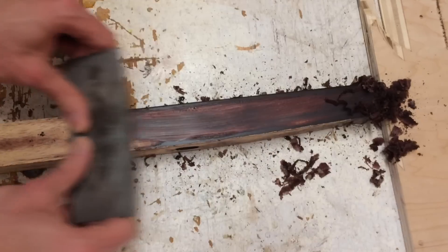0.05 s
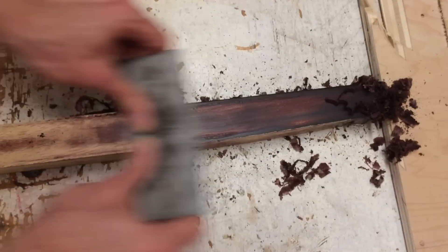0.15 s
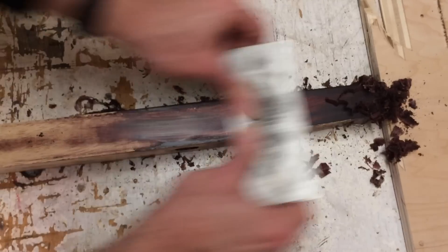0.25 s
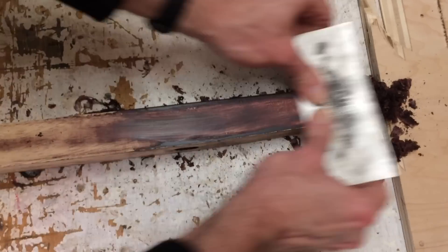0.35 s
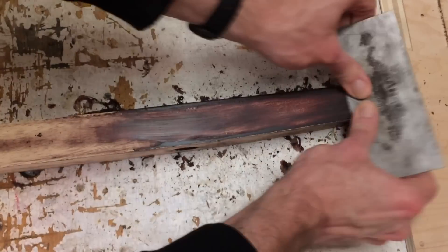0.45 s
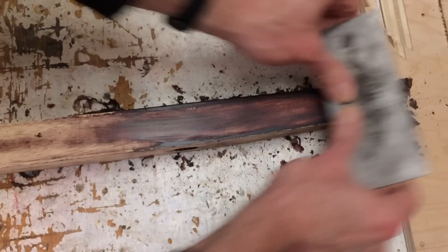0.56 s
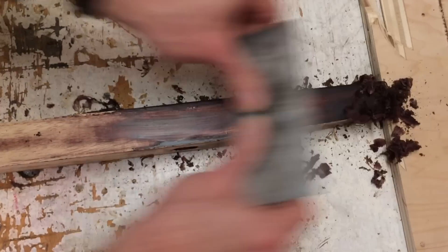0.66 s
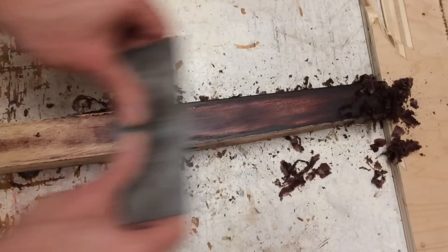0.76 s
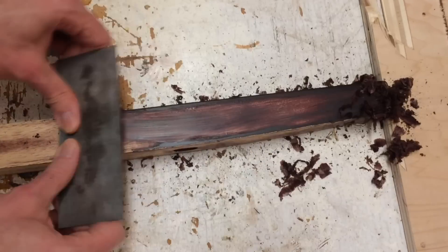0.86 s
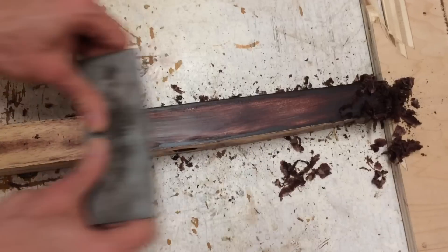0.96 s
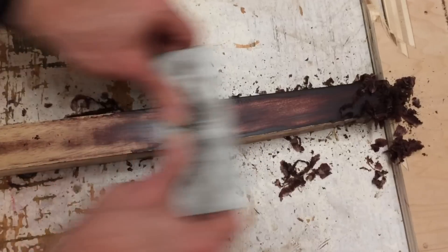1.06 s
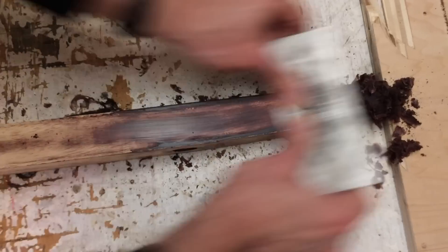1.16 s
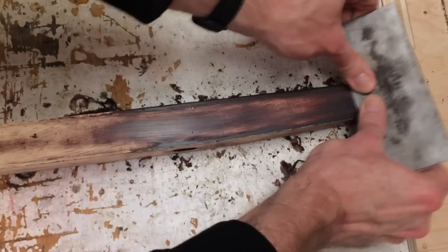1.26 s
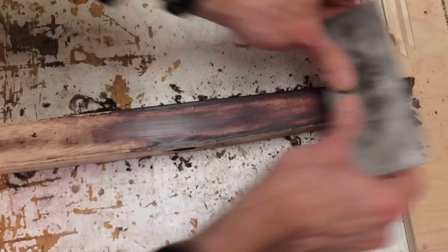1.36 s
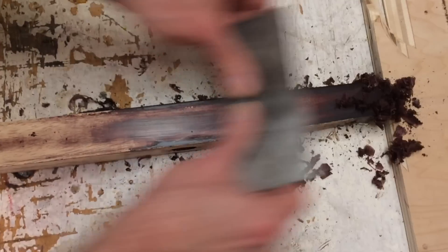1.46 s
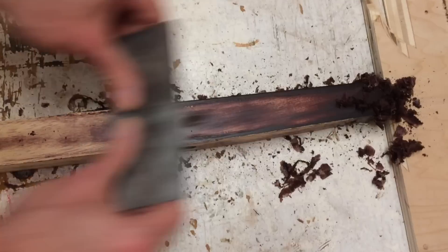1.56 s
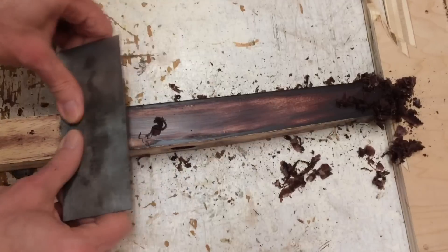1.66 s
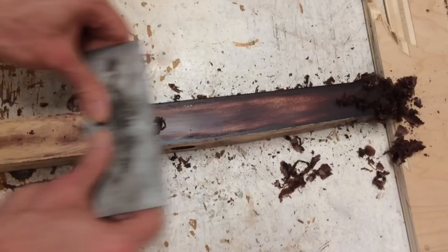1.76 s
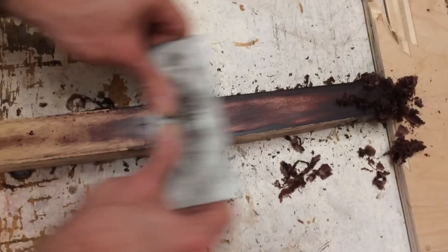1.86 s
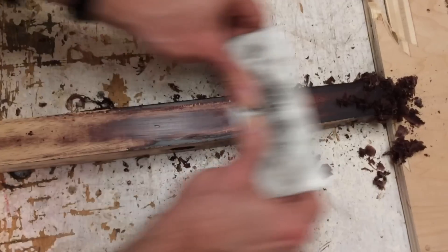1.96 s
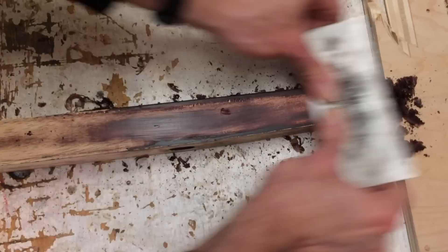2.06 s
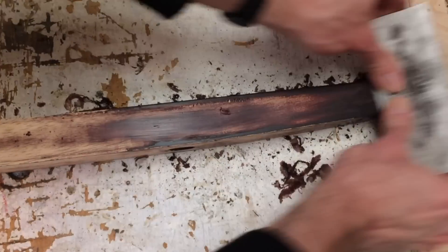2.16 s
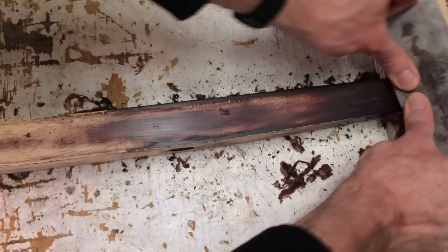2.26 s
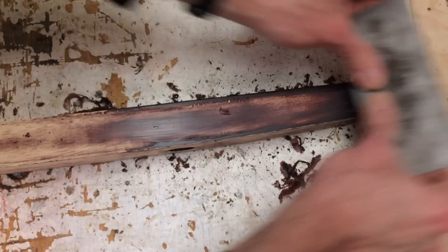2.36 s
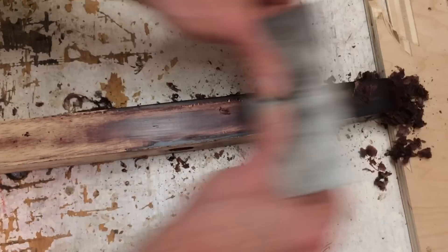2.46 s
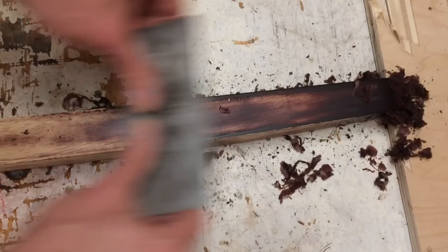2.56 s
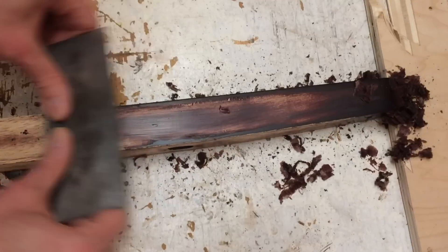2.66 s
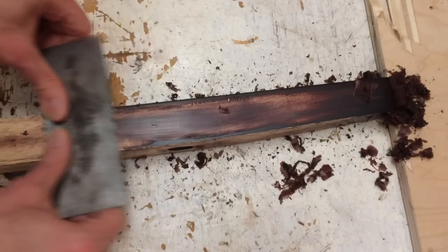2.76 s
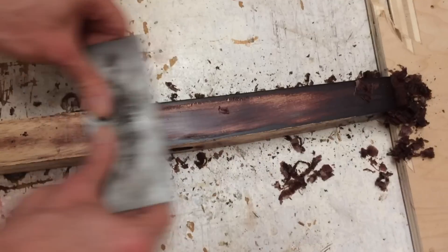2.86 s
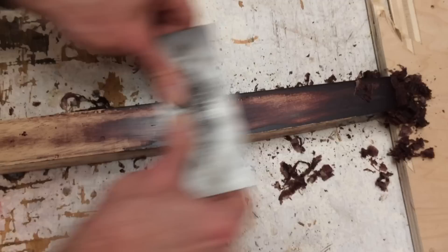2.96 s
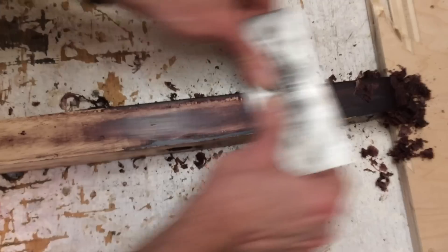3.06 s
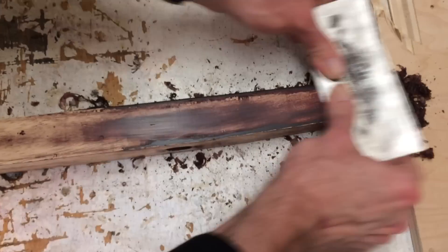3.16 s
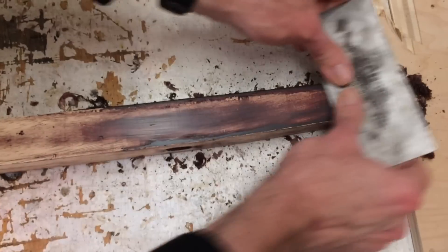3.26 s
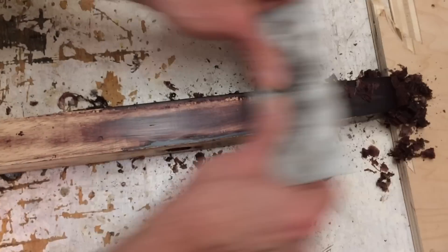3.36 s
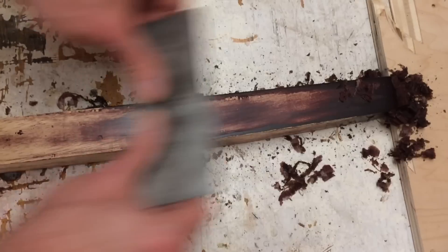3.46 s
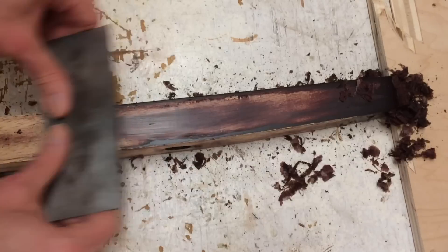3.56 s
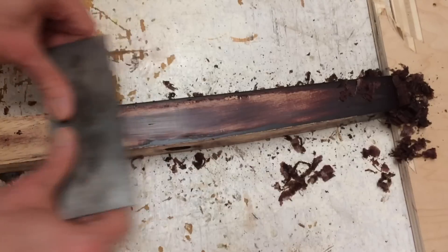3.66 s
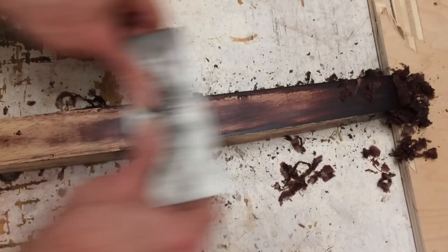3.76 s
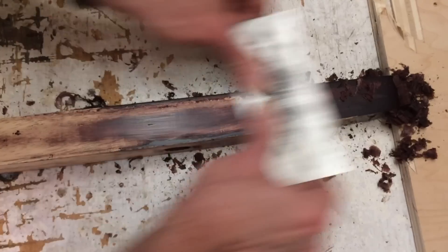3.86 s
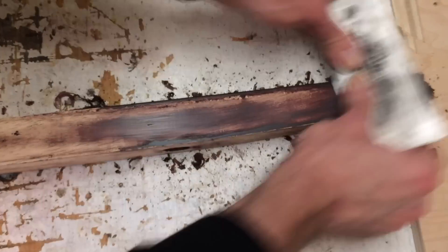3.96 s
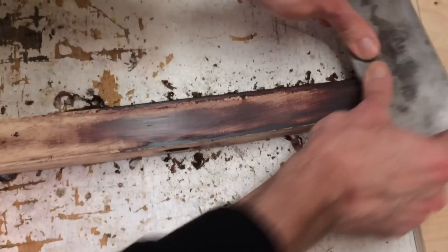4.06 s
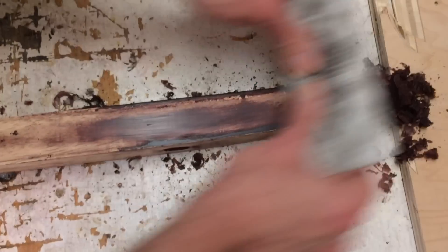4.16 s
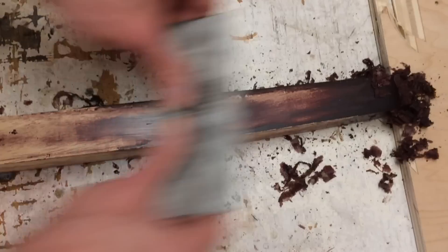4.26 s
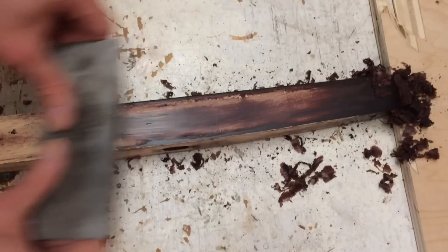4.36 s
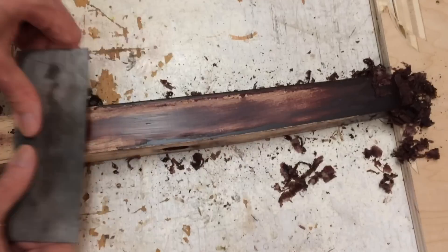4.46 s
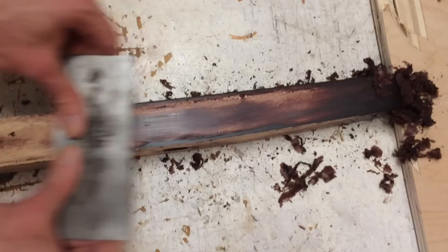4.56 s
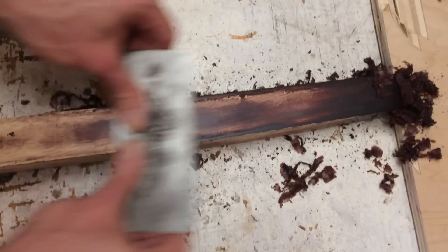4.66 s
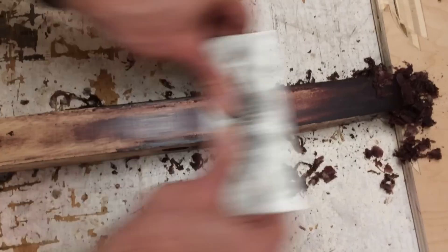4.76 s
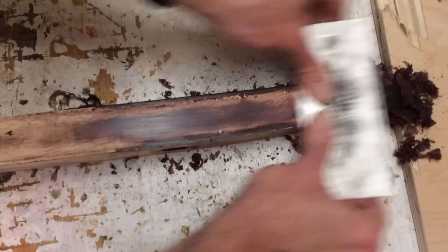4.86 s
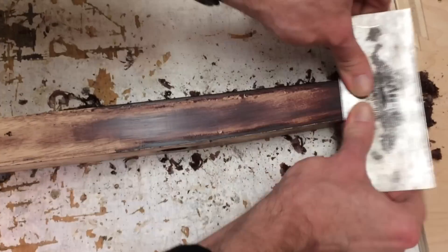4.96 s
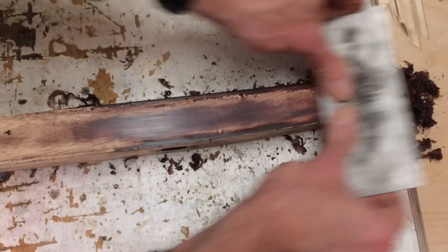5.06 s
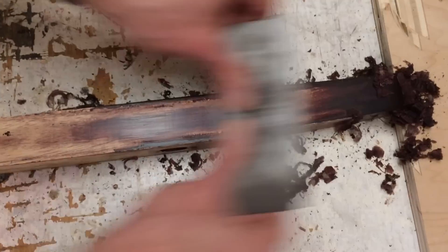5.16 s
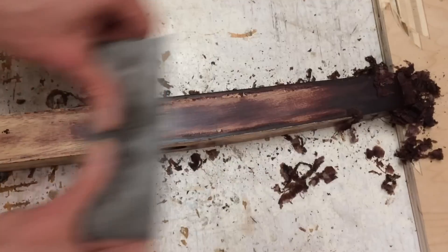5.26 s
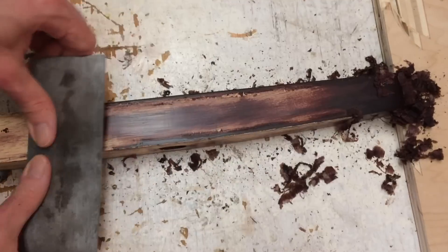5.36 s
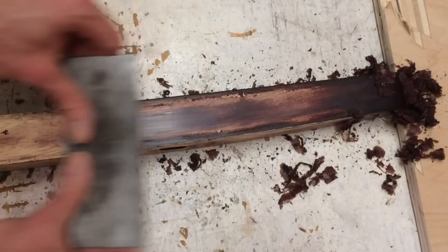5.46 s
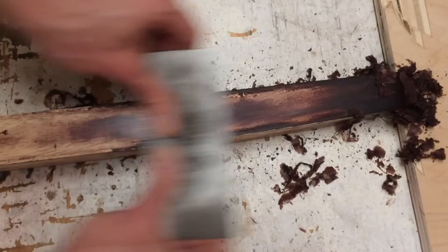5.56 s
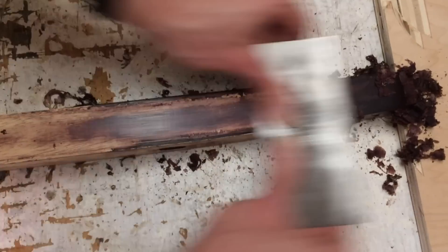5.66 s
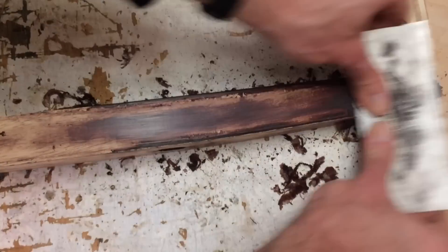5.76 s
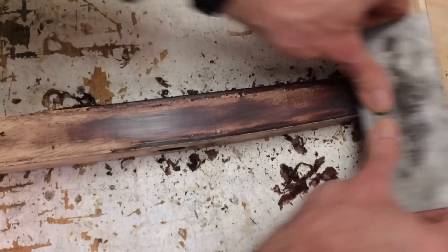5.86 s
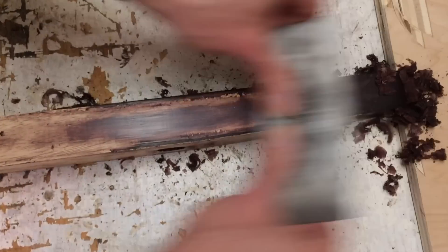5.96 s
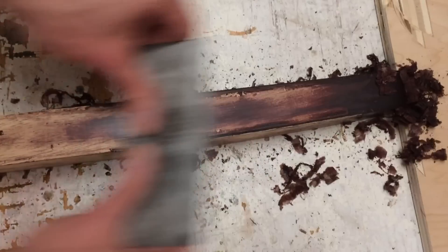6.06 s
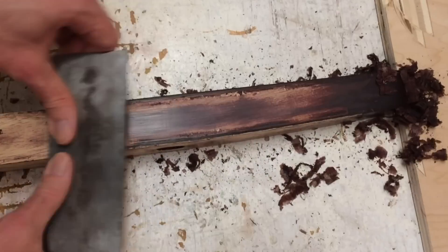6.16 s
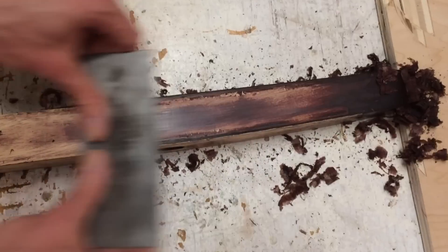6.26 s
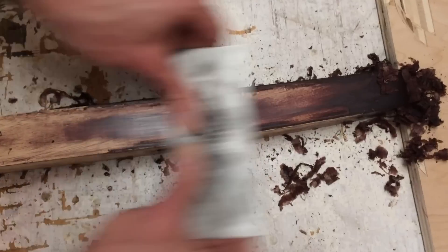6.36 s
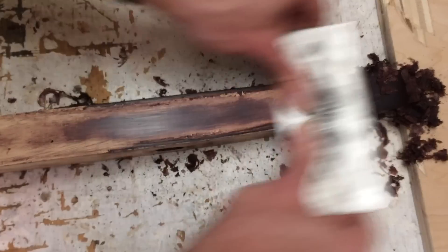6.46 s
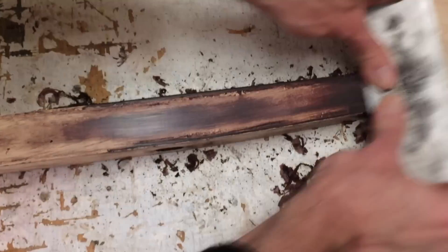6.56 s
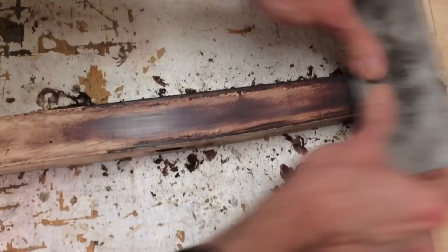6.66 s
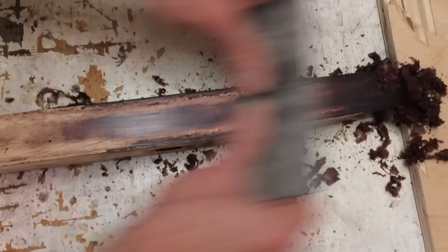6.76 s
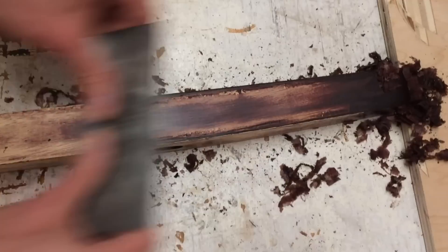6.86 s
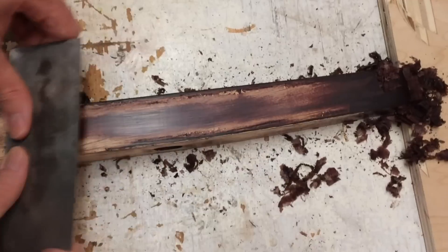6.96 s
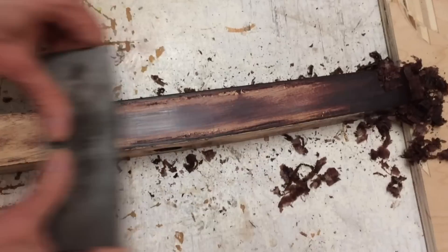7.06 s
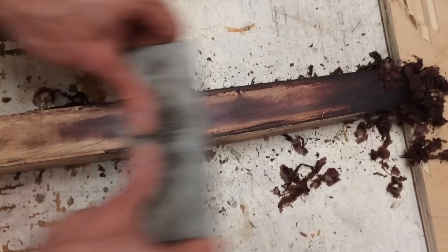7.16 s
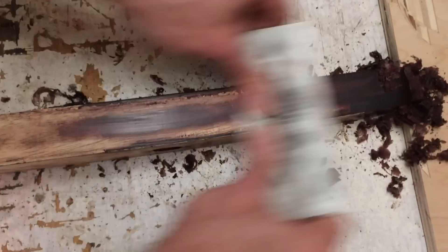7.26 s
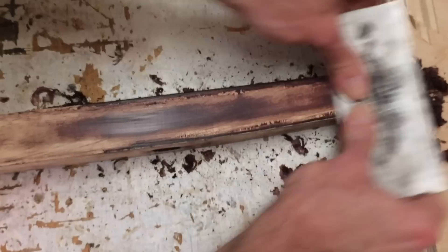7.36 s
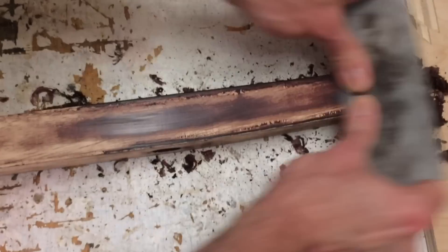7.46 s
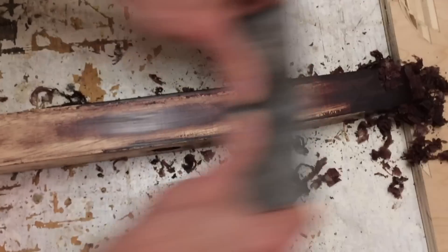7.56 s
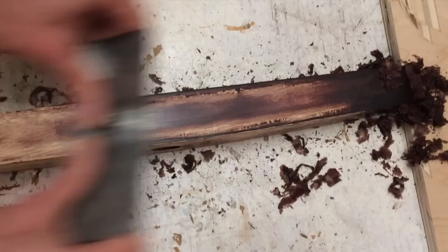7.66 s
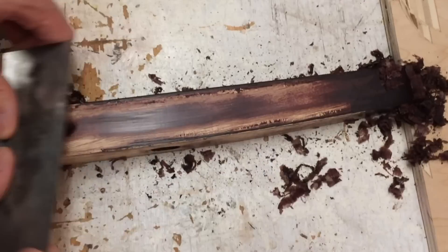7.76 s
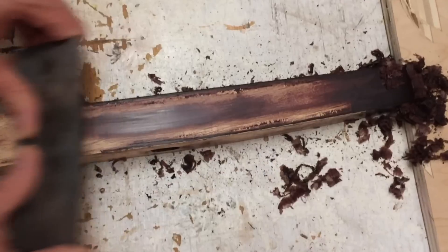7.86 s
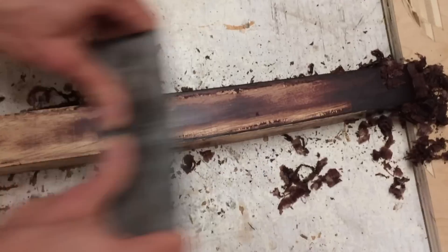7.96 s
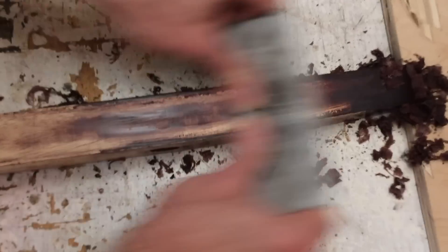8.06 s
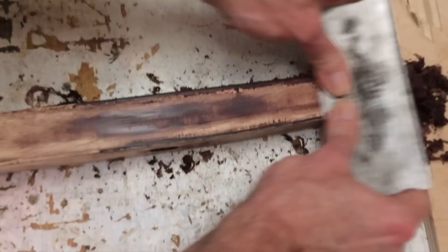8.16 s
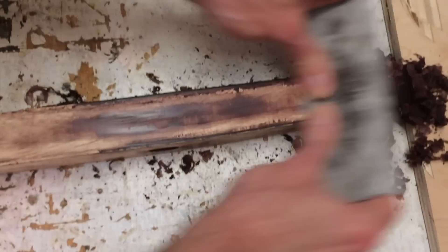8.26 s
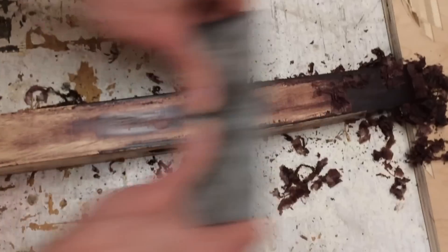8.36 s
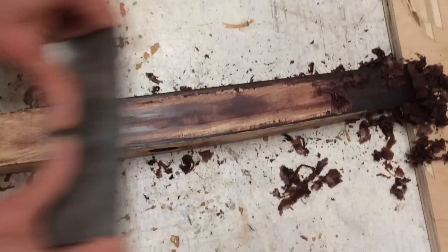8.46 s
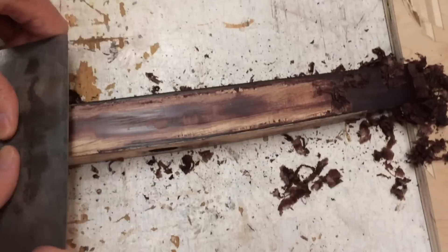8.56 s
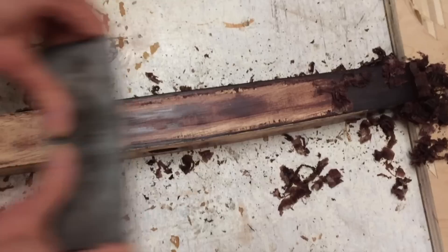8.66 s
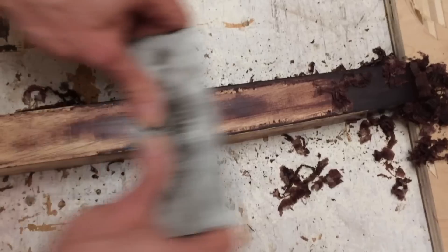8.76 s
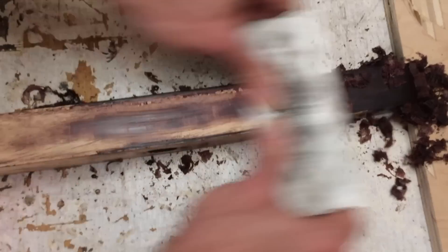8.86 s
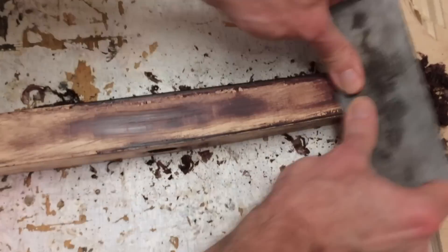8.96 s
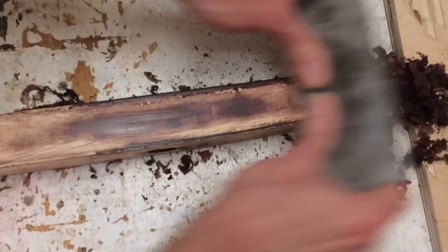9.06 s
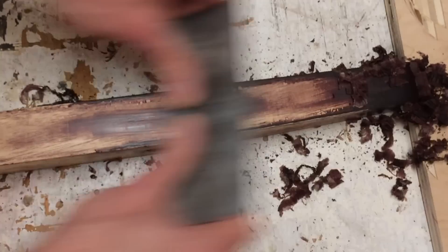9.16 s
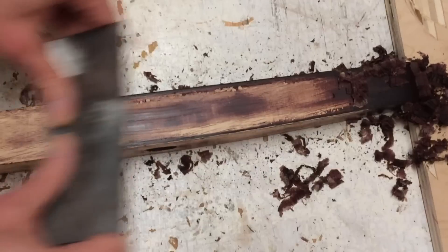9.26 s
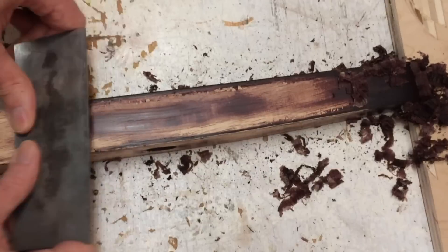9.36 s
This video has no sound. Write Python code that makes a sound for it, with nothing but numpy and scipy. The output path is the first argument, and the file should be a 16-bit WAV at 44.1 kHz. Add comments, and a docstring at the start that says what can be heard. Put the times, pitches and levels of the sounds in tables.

```python
"""A steel card scraper is pushed along a wooden chair leg on a workbench, stroke after stroke.
Its edge tears off old finish in countless tiny fractures, made as random pulses: they hiss, and through resonators
they ring the steel, rasp in the wood and shake leg and bench.
Each stroke starts with struck modes: the tick of the blade landing and the leg knocking on the bench.
Fingers rustle on some ways back; filtered noise and wavering sines give still air and a faint machine hum."""
import sys
import numpy as np
from scipy import signal
from scipy.fft import rfft, irfft
from scipy.io import wavfile
from scipy.ndimage import uniform_filter1d, map_coordinates

SR = 44100
rng = np.random.default_rng(int(sys.argv[2]) if len(sys.argv) > 2 else 0)


def wrap_up_sound(samples):
    """Save the sound to the file named by the first command line argument, as 16-bit audio."""
    columns = np.atleast_2d(samples).T
    # keep every value between -1 and 1, then stretch to whole-number steps
    tamed = np.clip(columns, -1, 1)
    steps = np.round(tamed * 32767).astype(np.int16)
    wavfile.write(sys.argv[1], SR, steps)


N = 414540
T = np.arange(N) / SR

# the blade lands: (time [s], level of the steel ring [dB], level of the finish crack [dB]), before trims
LANDINGS = [(0.0988, -25.5, -30), (0.9441, -27.5, -39.5), (1.76, -27.5, -41), (2.7906, -26.5, -41),
            (3.688, -28, -69), (4.5381, -32, -89), (5.468, -34.5, -48), (6.2572, -46, -62),
            (7.0808, -26, -28), (7.8471, -37, -58.5), (8.597, -41.5, -56.5), (9.3569, -34, -43)]
# the push after each landing: (hardest at [s], blade lifts at [s], hiss at the hardest [dB], swell up to it [dB],
# easing after it [dB], then wood rasp, sizzle, leg shake and bench shake, each relative to the hiss [dB]);
# each part's response law adds its own offset, share and lag
STROKES = [(.29, .504, -46.5, 12, 19, -2.5, 8.5, 3.7, 0), (1.197, 1.312, -44, 10.5, 19, -3.1, 2, 1.8, 2),
           (2.046, 2.248, -45, 15.5, 13, 2, 4, 6, 6), (3.165, 3.214, -46.5, 21.5, 5.5, 4, 2.5, 10, 9.5),
           (4.01, 4.05, -46, 12.5, 5, 2, 2.1, 6, 4), (4.88, 5.005, -44.5, 13.5, 2, -2.5, 3, -1.5, -2.5),
           (5.762, 5.822, -42, 19.5, 5.5, 1, -1, -2, 0.5), (6.493, 6.606, -45, 18, 5.5, 1.5, 4.5, 2.6, 1),
           (7.317, 7.431, -40, 11.5, 3.5, -1.5, 1.5, -2.3, -1), (8.064, 8.212, -37, 37, 10, -1, 2, -3, -1),
           (8.8, 8.984, -42, 43, 0, -2.7, 1, 1.5, 0.5), (9.6, 9.75, -45.5, 16, 5, 4.5, 0, -7, -1.5)]


def from_db(db):
    """Decibels to gain."""
    return 10 ** (np.asarray(db) / 20)


def rms_one(x):
    """Scale to unit power."""
    return x / np.sqrt(np.mean(x ** 2) + 1e-20)


def slow_noise(rate, step):
    """Noise smoothed by a double pole at a rate in Hz, one value per step of samples, with a spread of 1."""
    r = np.exp(-2 * np.pi * rate * step / SR)
    noise = rng.standard_normal((N + SR) // step + 2)
    settled = signal.lfilter([1], [1, -2 * r, r * r], noise)[SR // step:]
    return rms_one(settled)


def drift(rate, step=16):
    """Smooth chance with a spread of 1, interpolated between coarse steps."""
    slow = slow_noise(rate, step)
    return np.interp(T, np.arange(len(slow)) * step / SR, slow)


def swell(depth_db, rate, step=32):
    """A slow random gain, kept within twice its depth and held over each coarse step."""
    bounded = 2 * np.tanh(slow_noise(rate, step) / 2)
    return np.repeat(from_db(depth_db * bounded), step)[:N]


def coloured(x, spectrum):
    """Give a noise a smooth spectrum; rms 1."""
    hz, db = np.transpose(spectrum)
    bins = np.maximum(np.fft.rfftfreq(N, 1 / SR), 1)
    gain = from_db(np.interp(np.log(bins), np.log(hz), db))
    return rms_one(irfft(rfft(x) * gain, N))


def band(x, low_hz, high_hz):
    """Causal band-pass."""
    edges = [low_hz, min(high_hz, SR / 2 - 1000)]
    return signal.sosfilt(signal.butter(2, edges, "band", fs=SR, output="sos"), x + 1e-18)


def add(track, s, sound):
    """Mix a short sound into a track at a time."""
    i = int(s * SR)
    track[i:i + len(sound)] += sound[:N - i]


def fractures(per_s):
    """Tiny breaks of uneven size at random moments; rms 1."""
    return rms_one(rng.standard_normal(N) * (rng.random(N) < per_s / SR))


def resonate(x, peaks, wander_db, wander_rate):
    """Parallel resonances of alternating sign; each swells and fades as the blade passes its nodes."""
    out = np.zeros(N)
    for k, (hz, width, db) in enumerate(peaks):
        r = np.exp(-np.pi * width / SR)
        poles = [1, -2 * r * np.cos(2 * np.pi * hz / SR), r * r]
        ringing = (1 - r * r) / 2 * signal.lfilter([1, 0, -1], poles, x)
        out += (-1) ** k * from_db(db) * swell(wander_db, wander_rate) * ringing
    return out


def strike(modes, contact, vary_db):
    """One blow: the modes build up over the contact time [s], each with a strength of its own."""
    t = T[:SR // 3]
    rings = np.zeros(len(t))
    for hz, db, t60 in modes:
        level_db = db + vary_db * rng.standard_normal() - 60 * t / t60
        rings += from_db(level_db) * np.sin(2 * np.pi * hz * t)
    return rings * (1 - np.exp(-t / contact))


def workshop():
    """Still air is shaped noise; the distant machine's hum is sines wavering in level and pitch."""
    # still air, spectrum shape: (frequency [Hz], level per Hz [dB])
    air_spectrum = [(20, -29.5), (35, -7), (60, -1), (110, -5), (170, -9.5), (250, -16), (400, -19),
                    (700, -26), (1500, -27.5), (4000, -33.5), (9000, -36.5), (16000, -38.5)]
    # machine hum, relative lines: (frequency [Hz], level [dB])
    hum_lines = [(96, -11), (120, -1.5), (144, -10.5), (170, -9.5)]
    # rise and fall of the hum: (time [s], level [dB])
    hum_levels = [(0, -97), (4.4, -68), (5.3, -59.5), (6.1, -57.5), (6.9, -66.5), (7.7, -68.5), (9.4, -73)]
    hum = np.zeros(N)
    for hz, db in hum_lines:
        line_gain = from_db(db + 2.5 * drift(2.3))
        phase = 2 * np.pi * np.cumsum(hz * (1 + 0.0078 * drift(2))) / SR
        hum += line_gain * np.sin(phase)
    air = from_db(-66.5) * coloured(rng.standard_normal(N), air_spectrum)
    return from_db(np.interp(T, *np.transpose(hum_levels))) * rms_one(hum) + air


def landings(crack_decay, crush_db):
    """Steel meets wood: a short ring damped by the fingers, with a dull crush and a bright crack of old finish."""
    # struck card, relative modes: (frequency [Hz], level [dB], t60 [s])
    blade_modes = [(1065, -9, 0.043), (1343, -9, 0.027), (1615, 10.5, 0.009), (1787, -6.5, 0.031),
                   (2143, -11.5, 0.055), (2870, -2, 0.0093), (3457, -13, 0.025), (4123, -23, 0.081),
                   (7170, -5, 0.0089)]
    out, t = np.zeros(N), T[:SR // 20]
    for s, ring_db, crack_db in LANDINGS:
        burst = rng.standard_normal(len(t)) * np.exp(-t / crack_decay)
        add(out, s, from_db(ring_db - 2.0) * strike(blade_modes, contact=0.00024, vary_db=0.5))
        add(out, s, from_db(ring_db + crush_db) * band(burst, 540, 3960))
        add(out, s, from_db(crack_db + 2) * band(burst, 1900, 11000))
    return out


def knocks():
    """The leg is slapped down; it knocks, favouring the modes near one pitch, and the bench top booms."""
    # leg pressed onto the bench: (time [s], leg level [dB], bench level [dB], favoured pitch [Hz]), before trims
    knock_rows = [(0.103, -13, -20, 460), (0.945, -25.5, -29, 416), (1.768, -15, -19, 450),
                  (2.798, -19, -20, 414), (3.691, -30, -29.5, 231), (4.546, -24, -19, 256),
                  (5.469, -41.5, -26, 253), (6.258, -38.5, -24, 253), (7.082, -35, -19, 231),
                  (7.849, -38.5, -31.5, 355), (8.6, -34.5, -37.5, 251), (9.362, -21, -27.5, 364)]
    # struck leg and bench, relative modes: (frequency [Hz], level [dB], t60 [s])
    leg_modes = [(264.7, -4.5, 0.11), (315.3, 4.5, 0.045), (386, 3.5, 0.037), (433, 1, 0.045),
                 (516, -27.5, 0.052), (898, -5.5, 0.038)]
    bench_modes = [(68.3, -16.5, 0.17), (119.6, 0.5, 0.15), (143.4, 0.5, 0.073)]
    out = np.zeros(N)
    for s, leg_db, bench_db, pitch_hz in knock_rows:
        # each octave away from the favoured pitch costs 7 dB
        modes = [(hz, db - 7 * abs(np.log2(hz / pitch_hz)), t60) for hz, db, t60 in leg_modes]
        add(out, s, from_db(leg_db + 5) * strike(modes, contact=0.0048, vary_db=1.5))
        add(out, s, from_db(bench_db + 7.5) * strike(bench_modes, contact=0.011, vary_db=2.0))
    return out


def push(law, own_db):
    """Gain of one part: every stroke bites, swells to its hardest, eases, and dies away when the blade lifts."""
    offset_db, share, bite, lag, fall = law
    gain, elapsed = np.zeros(N), T[:SR]
    for (start, *_), (crest, lift, db, swell_db, ease_db, *_), part_db in zip(LANDINGS, STROKES, own_db):
        t = start + elapsed - lag
        to_go = np.clip((crest - t) / (crest - start), 0, 1)
        past = np.clip((t - crest) / (lift - crest), 0, 1)
        effort_db = -swell_db * to_go ** 2 - ease_db * past ** 2
        level_db = db + part_db + offset_db + share * effort_db - fall * np.maximum(t - lift, 0)
        add(gain, start, from_db(level_db) * np.minimum(elapsed / bite, 1))
    return gain


def bell(s, half_length):
    """A smooth bump of height 1 around a moment."""
    out = np.zeros(N)
    near = slice(max(int((s - 4 * half_length) * SR), 0), int((s + 4 * half_length) * SR))
    out[near] = np.exp(-((T[near] - s) / half_length) ** 2)
    return out


def bursts(rows):
    """One curve for each level column of a table of brief, smooth bumps."""
    gains = np.zeros((len(rows[0]) - 2, N))
    for s, half_length, *levels_db in rows:
        start = max(s - 3 * half_length, 0)
        bump = np.exp(-((start + T[:SR // 3] - s) / half_length) ** 2)
        for gain, db in zip(gains, levels_db):
            add(gain, start, from_db(db) * bump)
    return gains


def glide(x, share):
    """Resonances sag in pitch as the blade travels (or rise, for a negative share), and waver with the thumbs."""
    ends = [s for landing, stroke in zip(LANDINGS, STROKES) for s in (landing[0], stroke[1])]
    travel = np.interp(T, ends, [-1, 1] * len(STROKES))
    place = np.cumsum(1 + share * (.5 * drift(3) - travel))   # warped reading position, in samples
    return map_coordinates(x, [place], order=3, mode="mirror")


def held(x, size):
    """Even out a vibration's power over a span of samples, so that the force of the push alone sets it."""
    return x / np.sqrt(np.abs(uniform_filter1d(x ** 2, size=size)) + 1e-12)


def steel_ring(x, width_hz, count=52):
    """The bent card has many close modes, damped by the thumbs and shifting in strength with its flex."""
    pitches = np.linspace(2600, 15600, count) + rng.uniform(-110, 110, count)
    return rms_one(resonate(x, [(hz, width_hz, 0) for hz in pitches], wander_db=4.5, wander_rate=8))


def edge_hiss(grip, contact, scuff, sizzle_db):
    """Fine fractures sound directly and through the steel, as a broad hiss and a brighter sizzle."""
    # tearing fibres, then their finest part, spectrum shapes: (frequency [Hz], level per Hz [dB])
    hiss_spectrum = [(600, -14), (1500, -2), (2700, -4), (3800, -2.5), (4800, -5), (5700, -3.5),
                     (8500, -3.5), (10000, -4.5), (12500, -13), (17000, -35)]
    sizzle_spectrum = [(5000, -24.5), (8000, -15), (10000, -3.5), (12000, 1.5), (14500, 5), (17000, 4.5)]
    # response to the push: (offset [dB], share of the swing, bite [s], lag [s], fall after the lift [dB/s])
    hiss_law = (.8, 1.0, .035, .003, 470)
    sizzle_law = (-.7, 1.15, .065, .003, 560)
    fine = fractures(per_s=24000) * from_db(2.0 * grip)
    blows = fractures(per_s=12000) * from_db(1.3 * grip)
    edge = fine + from_db(1.5) * glide(steel_ring(blows, width_hz=80), share=.008)
    hiss_gain = np.hypot(contact * push(hiss_law, np.zeros(len(STROKES))), scuff)
    sizzle_gain = np.hypot(contact * push(sizzle_law, sizzle_db), from_db(-4) * scuff)
    return coloured(edge, hiss_spectrum) * hiss_gain + coloured(edge, sizzle_spectrum) * sizzle_gain


def wood_rasp(coarse, contact, scuff, rasp_db):
    """Coarse fractures ring the wood's resonances, which glide as the blade travels."""
    # wood before the glide: (frequency [Hz], width [Hz], level [dB])
    wood_peaks = [(895, 97, -1.5), (1063, 41, -2.5), (1163, 70, 1.5), (1344, 46, -1), (1440, 97, -1.5),
                  (1690, 140, -3), (1800, 84, -2), (2020, 45, 3.5), (2128, 65, -2.5), (2304, 72, -1),
                  (2786, 17, -8), (3077, 56, -1.5), (3510, 100, -8), (3960, 170, -18.5), (4280, 84, -8),
                  (5500, 39, -16.5)]
    # response to the push: (offset [dB], share of the swing, bite [s], lag [s], fall after the lift [dB/s])
    rasp_law = (1.0, .9, .02, .004, 530)
    wood = glide(resonate(coarse, wood_peaks, wander_db=4, wander_rate=5), share=.02)
    return held(band(wood, 680, 6500), size=2000) * np.hypot(contact * push(rasp_law, rasp_db), scuff)


def leg_shake(coarse, contact, judder, leg_db):
    """Coarse fractures shake the leg; its slow bending as a whole needs a hard push."""
    # leg before the glide, then its slow bending: (frequency [Hz], width [Hz], level [dB])
    leg_peaks = [(442, 61, -2), (497.4, 43, -4), (581, 22, -14), (671, 100, -18.5)]
    bending_peaks = [(250, 14, 1), (307.8, 25, -2), (350, 69, -7)]
    # response to the push: (offset [dB], share of the swing, bite [s], lag [s], fall after the lift [dB/s])
    leg_law = (-3.2, .7, .02, -.02, 310)
    bending_law = (-6.0, 1.0, .02, .01, 270)
    leg = glide(resonate(coarse, leg_peaks, wander_db=3.5, wander_rate=4.4), share=-.03)
    bending = resonate(coarse, bending_peaks, wander_db=2.5, wander_rate=2.6)
    shake = from_db(-2.5) * judder
    return (held(band(leg, 330, 1100), size=1500) * np.hypot(contact * push(leg_law, leg_db), shake)
            + held(band(bending, 210, 410), size=1500) * np.hypot(contact * push(bending_law, leg_db), shake))


def bench_shake(coarse, judder, bench_db):
    """Coarse fractures drive the low resonances of the bench."""
    # bench: (frequency [Hz], width [Hz], level [dB])
    bench_peaks = [(62.8, 18, -12.5), (107.8, 11, -2), (121.9, 12, 1), (134.8, 14, 0), (180.6, 26, -12.5)]
    # response to the push: (offset [dB], share of the swing, bite [s], lag [s], fall after the lift [dB/s])
    bench_law = (.5, .55, .03, .022, 170)
    bench = resonate(coarse, bench_peaks, wander_db=3, wander_rate=1.7)
    return held(band(bench, 32, 260), size=1500) * np.hypot(push(bench_law, bench_db), judder)


def scraping():
    """The edge grips and slips; its fractures hiss directly and drive the steel, the wood, the leg and the bench."""
    # the edge skims a smooth patch: (middle [s], half length [s], loss [dB], negative for a gain)
    skim_rows = [(0.238, 0.083, 5), (2.14, 0.039, 8.5), (4.785, 0.011, 11), (4.972, 0.0058, -2),
                 (5.727, 0.029, 7), (7.195, 0.037, 5.5), (8.049, 0.027, 10)]
    # the edge catches briefly: (middle [s], half length [s], rasp level [dB], hiss level [dB])
    scuff_rows = [(.187, 0.024, -44, -47), (.319, 0.014, -40, -43), (1.212, 0.0074, -48, -36.5),
                  (2.095, 0.015, -38, -39.5), (2.255, 0.0091, -48, -56), (3.06, 0.0069, -45, -56),
                  (3.137, 0.0095, -41, -44), (3.202, 0.016, -42, -44.5), (3.296, 0.0064, -58.5, -62),
                  (3.965, 0.012, -37.5, -54), (4.052, 0.018, -36, -41), (4.764, 0.017, -54, -62),
                  (4.815, 0.012, -37.5, -43), (4.875, 0.0079, -36, -47), (4.92, 0.012, -58, -44),
                  (4.95, 0.0073, -40.5, -52), (5.072, 0.0086, -54, -68), (5.1, 0.01, -54, -56.5),
                  (5.672, .016, -39.5, -42), (5.822, 0.012, -44, -36.5), (6.41, 0.011, -40.5, -45.5),
                  (6.573, 0.019, -37, -45.5), (7.283, 0.0088, -34, -49), (7.506, 0.0081, -71, -59),
                  (8.08, 0.0086, -29, -38), (8.296, 0.014, -71, -60), (8.658, .005, -55.5, -65),
                  (8.909, 0.0057, -31, -33.5)]
    # the leg judders under a hard push: (middle [s], half length [s], bench level [dB], leg level [dB] before a trim)
    judder_rows = [(0.161, 0.048, -38, -40.5), (0.198, 0.012, -40, -34), (0.329, 0.017, -34, -50),
                   (0.485, 0.014, -34, -56), (0.535, 0.016, -41.5, -69.5), (1.045, 0.009, -54, -36),
                   (1.21, 0.013, -25.5, -39), (1.975, 0.01, -44, -33), (2.02, 0.015, -30.5, -41.5),
                   (2.222, 0.067, -32, -52), (3.114, 0.037, -23.5, -49), (3.886, 0.025, -30.5, -38),
                   (3.94, 0.04, -26.5, -37.5), (4.037, 0.026, -28, -45.5), (4.835, 0.023, -37.5, -40),
                   (5.006, 0.074, -35, -50.5), (5.597, 0.012, -47, -39), (5.734, 0.016, -30, -63),
                   (5.802, 0.042, -37, -65), (6.46, 0.013, -53, -38), (6.502, 0.042, -32.5, -40.5),
                   (6.586, 0.037, -35, -57), (6.673, 0.02, -45.5, -66), (7.29, 0.014, -52, -33),
                   (7.352, 0.03, -26, -39.5), (7.425, 0.029, -28, -39.5), (8.013, 0.025, -37, -30),
                   (8.12, 0.057, -23.5, -29.5), (8.289, 0.033, -37.5, -66), (8.862, 0.0092, -33, -29),
                   (8.94, 0.052, -24.5, -39)]
    *_, rasp_db, sizzle_db, leg_db, bench_db = np.transpose(STROKES)
    skim_db = -sum(db * bell(s, half) for s, half, db in skim_rows)
    contact = from_db(skim_db) * swell(depth_db=1.2, rate=7.7)   # uneven old finish
    scuff_rasp, scuff_hiss = bursts(scuff_rows)
    judder_bench, judder_leg = bursts(judder_rows)
    grip = 0.32 * drift(250) + 0.55 * drift(32)   # fast chatter within slower patches of finish
    coarse = fractures(per_s=3000) * from_db(1.7 * grip)
    return (edge_hiss(grip, contact, scuff_hiss, sizzle_db)
            + wood_rasp(coarse, contact, scuff_rasp, rasp_db)
            + leg_shake(coarse, contact, judder_leg, leg_db)
            + bench_shake(coarse, judder_bench, bench_db))


def handling(rise, decay):
    """Fingers shift on the card with a soft, dull rustle of tiny fractures."""
    # soft shifts of the hands on the way back: (time [s], level [dB]), before the trim and envelope
    shift_rows = [(1.589, -61), (1.686, -61), (2.726, -59.5), (4.329, -68), (5.302, -52), (6.833, -62.5),
                  (7.712, -60.5), (8.491, -55.5)]
    # rustle, spectrum shape: (frequency [Hz], level per Hz [dB])
    rustle_spectrum = [(150, -23), (400, 6), (1200, 2), (2200, -11.5), (4000, -15), (8000, -26),
                       (16000, -17)]
    gain, t = np.zeros(N), T[:SR // 4]
    for s, db in shift_rows:
        add(gain, s, from_db(db - 3.5) * (1 - np.exp(-t / rise)) * np.exp(-t / decay))
    return gain * coloured(fractures(per_s=6000), rustle_spectrum)


def reverberation(x, t60, wet_db):
    """A faint, dull tail from the walls: decaying band-passed noise that begins after 8 ms."""
    t = T[:SR // 2]
    tail = band(rng.standard_normal(len(t)), 130, 3927) * from_db(-60 * t / t60) * (t > .008)
    return from_db(wet_db) * signal.fftconvolve(x, tail / np.sqrt(np.sum(tail ** 2)))[:N]


def scene():
    """The work with its wall reflections and the workshop around it, alike in both channels."""
    work = landings(crack_decay=0.0055, crush_db=-1.5) + knocks() + scraping()   # decay in s
    work += handling(rise=0.00091, decay=0.018)   # both in s
    mix = work + reverberation(work, t60=0.17, wet_db=-20.5) + workshop()
    return np.tile(mix, (2, 1))


def record(dry):
    """A steep elliptic low-pass cuts the top above 15.9 kHz."""
    return signal.sosfilt(signal.ellip(10, .2, 70, 15900, fs=SR, output="sos"), dry)


dry = scene()
out = record(dry)
wrap_up_sound(out)
```